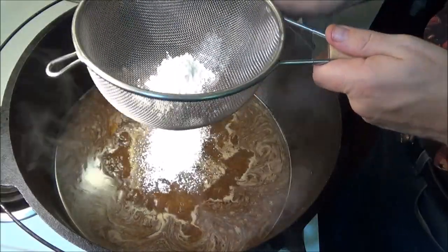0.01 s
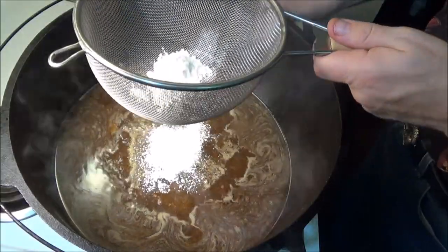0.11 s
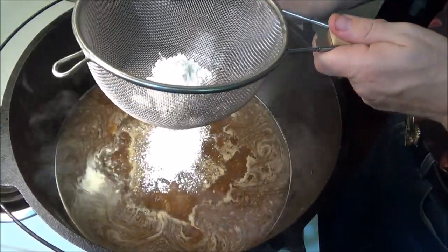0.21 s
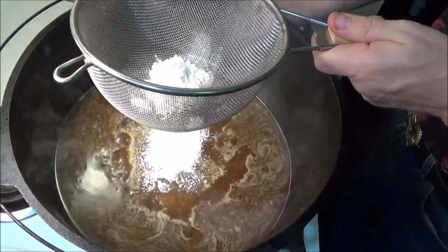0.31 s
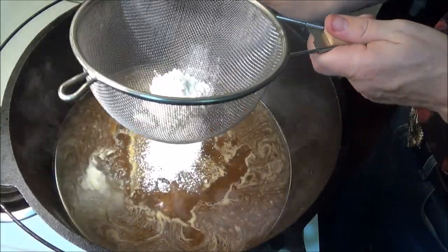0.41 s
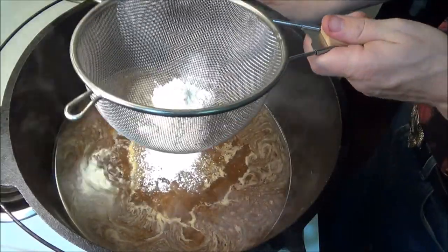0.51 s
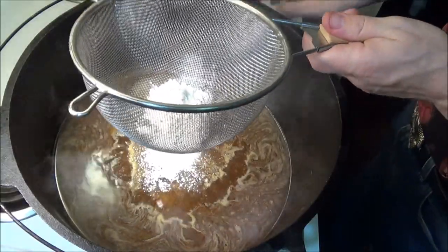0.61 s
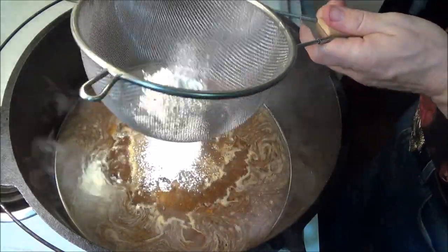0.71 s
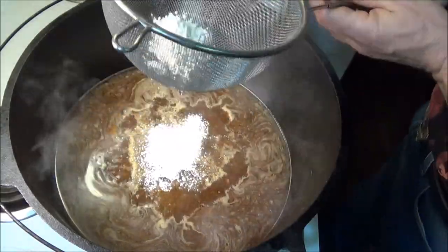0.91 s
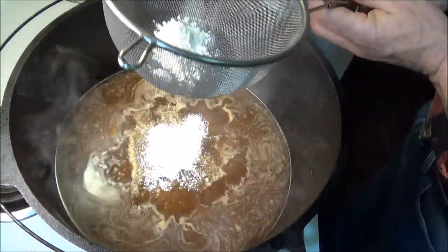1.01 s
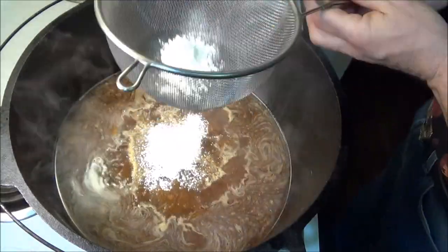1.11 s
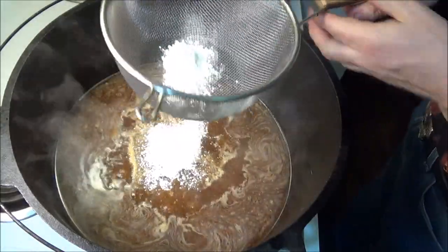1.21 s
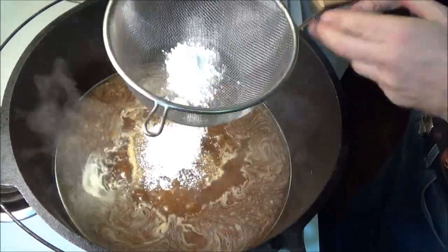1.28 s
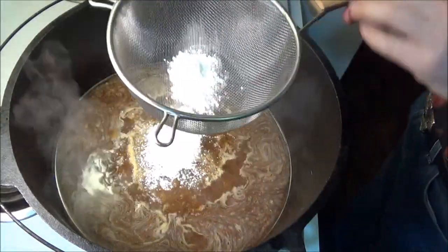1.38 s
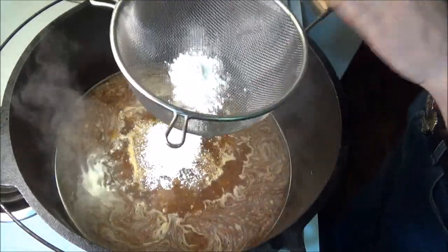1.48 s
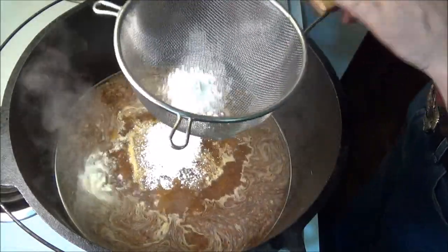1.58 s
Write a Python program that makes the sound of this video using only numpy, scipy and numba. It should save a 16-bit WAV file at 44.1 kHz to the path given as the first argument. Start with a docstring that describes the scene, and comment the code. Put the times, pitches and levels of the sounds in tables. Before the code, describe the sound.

A metal sieve knocks against an iron pot at about 0.2 seconds and again at 0.5. Each knock rattles the mesh and rings briefly, with a short kitchen echo. Faint swishes of a hand shifting its grip follow from 0.9 to 1.3 seconds, and the sieve gives a light click near 1.55. Quiet room noise, electrical hum and the soft fizz of simmering liquid continue underneath.

```python
"""Flour sieve over a simmering pot

A hard-walled kitchen in stereo, with the sieve centred before the microphone. It is knocked twice over
an iron pot; each knock is two contacts that rattle the mesh, ring the metal and fill the room.
The grip swishes softly, and the frame clicks once at the start and again near the end.
Behind lie room noise, mains hum and fizzing bubbles; the recorder's limiter holds down the peaks."""
import sys
import numpy as np
from scipy import signal
from scipy.fft import rfft, irfft
from scipy.io import wavfile
from numba import njit

SR = 44100
rng = np.random.default_rng(int(sys.argv[2]) if len(sys.argv) > 2 else 0)


def generate_wav(signal):
    """Clip the signal to [-1, 1] and save it as 16-bit WAV at the path in sys.argv[1]."""
    frames = np.transpose(np.atleast_2d(signal))
    scaled = np.clip(frames, -1, 1) * 32767
    pcm = np.round(scaled).astype(np.int16)
    wavfile.write(sys.argv[1], SR, pcm)


N = 70560

# Stereo spread of the contacts and their echoes. Each row: frequency in Hz, side minus mid in dB.
CONTACT_WIDTH = [(60, -36), (130, -14.5), (380, -11.5), (700, -8.5), (1290, -5.5), (2380, -8), (4400, -8),
                 (8120, -9), (15000, -21)]
# Stereo spread of the quiet sounds. Each row: frequency in Hz, side minus mid in dB.
AMBIENT_WIDTH = [(60, -32), (110, -10), (200, -24), (380, -16.5), (700, -13), (1290, -7.5), (2380, -7),
                 (4400, -6.5), (8120, -12.5), (15000, -32)]


def undb(db):
    """Decibels to gain."""
    return 10 ** (np.asarray(db) / 20)


def on_bins(points):
    """A (Hz, value) table spread over the frequency bins."""
    hz, value = np.array(points, float).T
    return np.interp(np.log(np.arange(N // 2 + 1) * SR / N + 1), np.log(hz), value)


def stereo(colour, width, side_db=0, source=None):
    """Left and right spectra of coloured noise (or of a given mid and side source), mid rms 1."""
    if source is None:
        source = rng.standard_normal((2, N))
    mid, side = rfft(source) * undb(on_bins(colour))
    side = side * undb(on_bins(width) + side_db)
    return np.array([mid + side, mid - side]) / np.std(irfft(mid, N))


def fade(start, rise, t60):
    """Envelope that rises quickly at the start and dies away; times in seconds."""
    age = np.maximum(np.arange(N) / SR - start, 0)
    return (1 - np.exp(-age / rise)) * np.exp(-np.log(1000) * age / t60)


def room_tone(noise_db=-60):
    """Steady kitchen noise with electrical hum."""
    # Spectrum of the room noise. Each row: frequency in Hz, relative level in dB.
    colour = [(25, -14), (60, -14), (95, -12.5), (130, -2), (180, -4), (250, 0), (370, 1.5), (580, -4.5),
              (800, -1), (1400, -10.5), (2100, -11), (6400, -20), (10100, -15.5), (13900, -20),
              (15500, -39)]
    # Mains hum and a thin electrical whine. Each row: frequency in Hz, level in dB.
    tones = [(60, -72), (120, -80.5), (180, -73), (15734, -77)]
    turn = 2 * np.pi * np.arange(N) / SR
    hum = sum(np.sqrt(2) * undb(db) * np.sin(hz * turn + 2 * np.pi * rng.random()) for hz, db in tones)
    return undb(noise_db) * irfft(stereo(colour, AMBIENT_WIDTH), N) + hum


def simmer(level_db=-69, pops_per_s=1500):
    """Tiny bubbles in the pot burst so densely that they make a soft fizz."""
    # Spectrum of the bursts. Each row: frequency in Hz, relative level in dB.
    colour = [(300, 3), (1200, 13), (3000, -12.5), (6000, -5), (11000, -2.5), (15000, -19)]
    pops = rng.standard_normal((2, N)) * (rng.random((2, N)) < pops_per_s / SR)
    return undb(level_db) * irfft(stereo(colour, AMBIENT_WIDTH, source=pops), N)


def grip_swishes(rolloff_hz=13100):
    """Brief swells of friction as the grip shifts on the sieve."""
    # Hand movements, bell-shaped in time and pitch. Each row: peak time and spread in seconds,
    # level in dB, centre in Hz, spread in octaves.
    moves = [(0.172, 0.11, -68.5, 1520, 1.4), (0.897, 0.0092, -66, 9000, 0.88),
             (0.966, 0.024, -66.5, 9900, 0.32), (1.043, 0.038, -65.5, 1470, 1.1),
             (1.143, 0.11, -65, 4500, 1.3), (1.217, 0.036, -63.5, 9250, 0.85),
             (1.325, 0.0092, -64, 10000, 0.46)]
    t, hz, out = np.arange(N) / SR, np.geomspace(100, 16000, num=40), 0
    for at, spread, db, centre, octaves in moves:
        band = np.exp(-.5 * (np.log2(hz / centre) / octaves) ** 2)
        band_db = 20 * np.log10(band / np.hypot(1, (hz / rolloff_hz) ** 10))
        hiss = irfft(stereo(list(zip(hz, band_db)), AMBIENT_WIDTH), N)
        swell = np.exp(-.5 * ((t - at) / spread) ** 2)
        out += undb(db) * hiss * swell
    return out


def kitchen_tail(start, colour, build_s=0.0042, bass_late_s=0.014, bass_hz=248):
    """Dense echoes of one contact; the bass builds up later at the microphone and stays longer."""
    # Decay of the kitchen. Each row: frequency in Hz, time to fall 60 dB in seconds.
    decays = [(60, 1.1), (150, 0.96), (300, .8), (700, 0.4), (1800, 0.4), (4800, 0.31), (9500, 0.21),
              (14000, 0.16)]
    echoes, out = stereo(colour, CONTACT_WIDTH), 0
    for hz, t60 in decays:
        band = on_bins([(centre, centre == hz) for centre, _ in decays])
        rise = build_s + bass_late_s / (1 + (hz / bass_hz) ** 2)
        out += irfft(echoes * band, N) * fade(start, rise, t60)
    return out


def wire_rattle(start, rise, colour, t60):
    """The short crash of wire at a contact, narrower in the stereo image than its echoes."""
    return irfft(stereo(colour, CONTACT_WIDTH, side_db=-6.5), N) * fade(start, rise, t60)


def metal_ring(start, rise, modes):
    """Struck metal rings in decaying partials, a little out of phase between left and right."""
    turn, out = 2 * np.pi * np.arange(N) / SR, 0
    for hz, t60, db in modes:
        half_turns, skew = rng.uniform(-1.16, 1, 2)
        phase = np.pi * half_turns + skew * np.array([[.5], [-.5]])
        out += np.sqrt(2) * undb(db) * fade(start, rise, t60) * np.sin(hz * turn + phase)
    return out


def frame_clicks(rise_s=0.00054, tail_db=-17.5):
    """Light contacts tick and ring the wire frame, with little of the room on them."""
    # Contacts of the frame. Each row: start in seconds, level in dB, ring relative to the tick in dB.
    clicks = [(.12, -51, -28), (1.5535, -50, 3), (1.5562, -40, -18), (1.559, -34.5, -23), (1.569, -44, 1.5)]
    # Spectrum of a tick. Each row: frequency in Hz, relative level in dB.
    colour = [(100, -7), (300, -10), (680, 2.5), (1050, -18), (1700, -2.5), (2500, -4.5), (3100, -7.5),
              (3700, -0.5), (4400, -8.5), (5400, -9), (7800, -2.5), (11500, -8.5), (13500, -20),
              (15500, -21)]
    # Modes of the frame. Each row: frequency in Hz, time to fall 60 dB in seconds, relative level in dB.
    modes = [(1950, 0.057, -11), (2130, 0.14, -14), (2310, 0.11, -13), (2250, 0.077, -12), (2670, .09, -11)]
    out = 0
    for start, db, ring_db in clicks:
        tick = wire_rattle(start, rise_s, colour, t60=0.026)
        tail = undb(tail_db) * kitchen_tail(start, colour)
        ring = undb(ring_db) * metal_ring(start, rise_s, modes)
        out += undb(db) * (tick + tail + ring)
    return out


def sieve_knocks(ring_db=2, ring_rise_s=0.011):
    """Each contact rattles the mesh and fills the room; the hardest of each knock rings the metal."""
    # Two contacts for each knock. Each row: start in seconds, level in dB, rattle rise in seconds,
    # rattle relative to the room tail in dB.
    knocks = [
        [(.2268, -25, .0012, -1), (.2335, -25, 0.0012, -7)],
        [(.4855, -33, 0.0024, 4), (.497, -30.5, 0.00013, 3.5)],
    ]
    # One spectrum for each knock. Each row: frequency in Hz, relative level in dB.
    colours = [
        [(50, -44), (90, -30), (140, -13.5), (325, -19), (480, -9.5), (700, -8.5), (1250, -8.5), (2270, -13),
         (3200, -13.5), (4300, -17.5), (7000, -20), (10800, -16.5), (12200, -25), (14000, -24), (15500, -39)],
        [(50, -37), (90, -16.5), (140, -6.5), (260, -18), (400, -8.5), (600, -10), (800, 1.5), (1100, -9),
         (1400, -7.5), (1720, -15), (2200, -9), (3000, -14), (4200, -17.5), (5300, -16.5), (6400, -20),
         (7200, -24), (8600, -20), (9700, -19), (10600, -18.5), (11800, -28), (13000, -25.5), (15500, -38)],
    ]
    # Modes of sieve and pot. Each row: frequency in Hz, time to fall 60 dB in seconds,
    # relative level in dB in the first knock and in the second.
    metal_modes = [(383, 0.64, -20, -23.5), (429, 0.6, -21, -28), (489.8, 0.2, -1, -4),
                   (585.7, 0.25, -4, -13), (715, 0.4, -34, -6.5), (730, 0.14, -20, -3.5),
                   (897, 0.33, -10.5, -19), (1008, 0.51, -16.5, -22), (1045, 0.19, -32, -13.5),
                   (1164, 0.4, -22, -16.5), (1347, 0.31, -25, -15.5), (1427, 0.54, -19.5, -22),
                   (1538, 0.36, -34, -18), (1623, 0.44, -16.5, -16), (1770, 0.4, -13, -28),
                   (2092, 0.15, -15, -8.5), (2260, 0.13, -2, -43), (2530, 0.5, -23.5, -44),
                   (2705, 0.27, -16, -23)]
    out = 0
    for k, (contacts, colour) in enumerate(zip(knocks, colours)):
        for start, db, rise, rattle_db in contacts:
            mesh = undb(rattle_db) * wire_rattle(start, rise, colour, t60=0.12)
            out += undb(db) * (mesh + kitchen_tail(start, colour))
        start, db = max(contacts, key=lambda row: row[1])[:2]
        modes = [(hz, t60, levels[k]) for hz, t60, *levels in metal_modes]
        out += undb(db + ring_db) * metal_ring(start, ring_rise_s, modes)
    return out


def scene():
    """Sieve, pot and kitchen as they reach the microphone."""
    return sieve_knocks() + frame_clicks() + grip_swishes() + simmer() + room_tone()


@njit
def follow(x, attack_s, release_s):
    """Level follower with separate rise and fall times."""
    out, level = np.empty(len(x)), 0.
    for i in range(len(x)):
        level += (x[i] - level) / (SR * (attack_s if x[i] > level else release_s))
        out[i] = level
    return out


def record(dry, limit_db=-23.5, ratio=14, top_hz=16000):
    """The recorder limits both channels together, then cuts the highest treble."""
    level = follow(np.abs(dry).mean(axis=0), attack_s=0.00033, release_s=0.01)
    gain = np.maximum(level / undb(limit_db), 1) ** (1 / ratio - 1)
    lowpass = signal.ellip(10, .2, 80, top_hz, fs=SR, output="sos")
    return signal.sosfilt(lowpass, dry * gain)


dry = scene()
out = record(dry)
generate_wav(out)
```